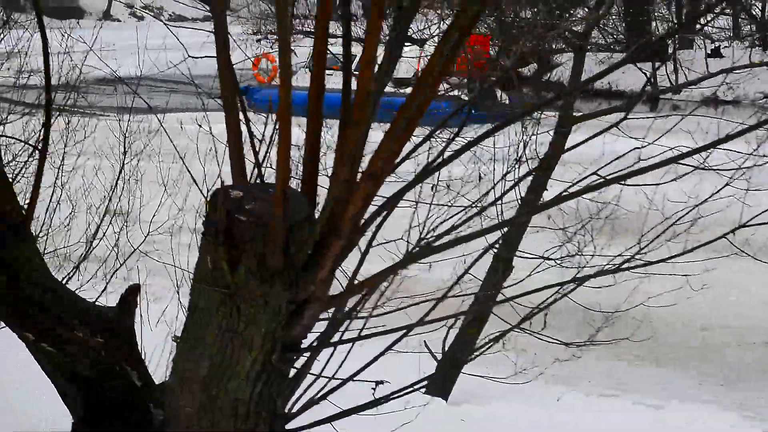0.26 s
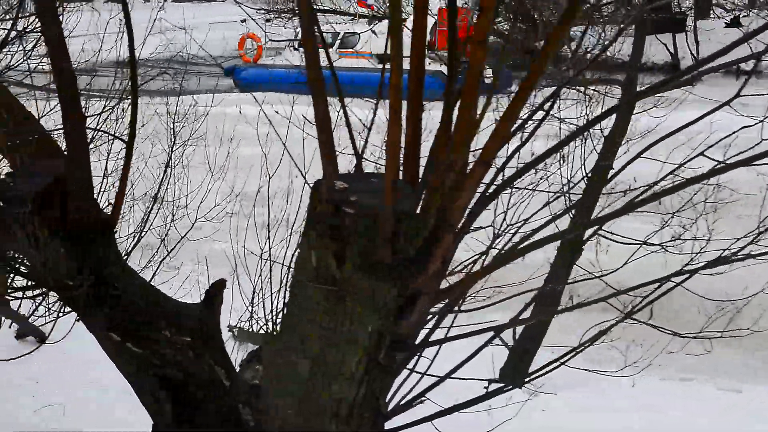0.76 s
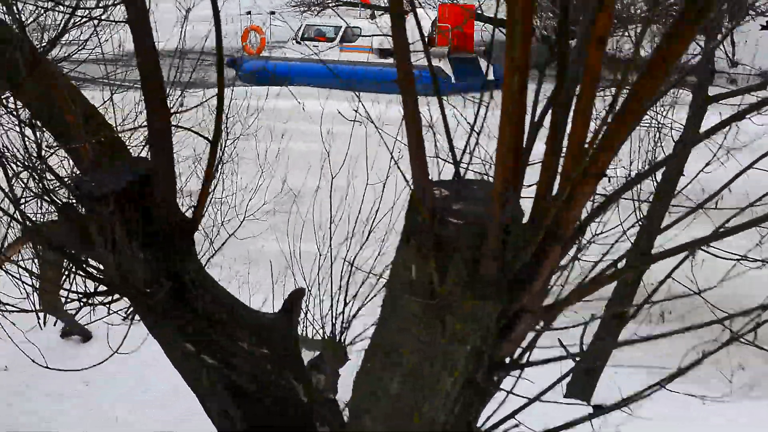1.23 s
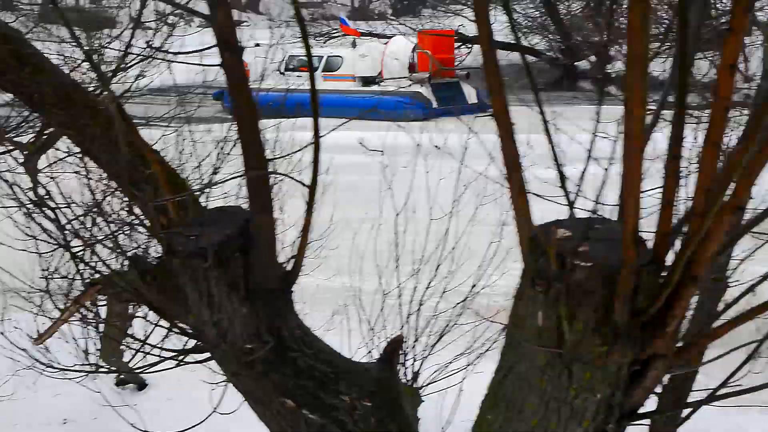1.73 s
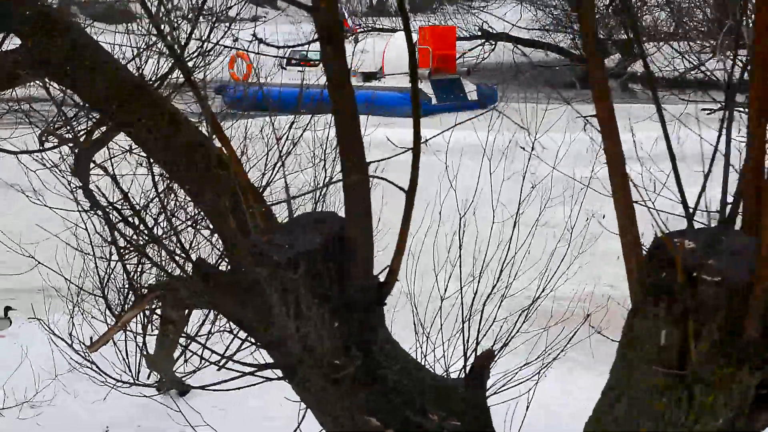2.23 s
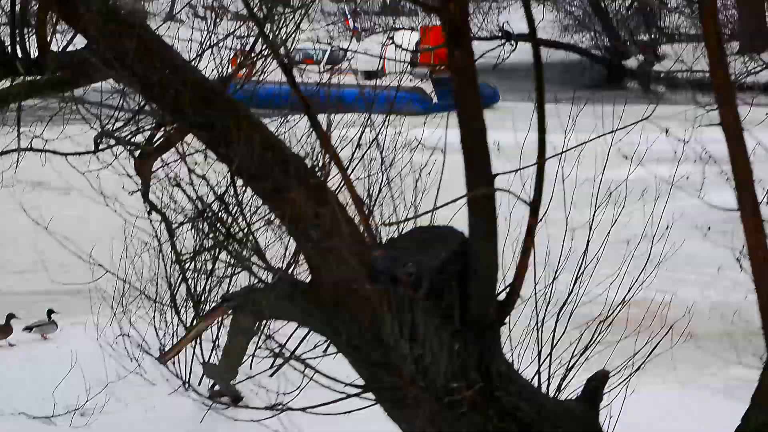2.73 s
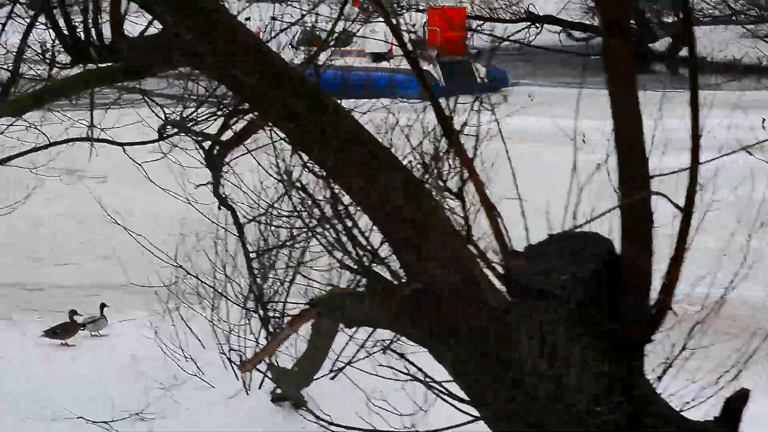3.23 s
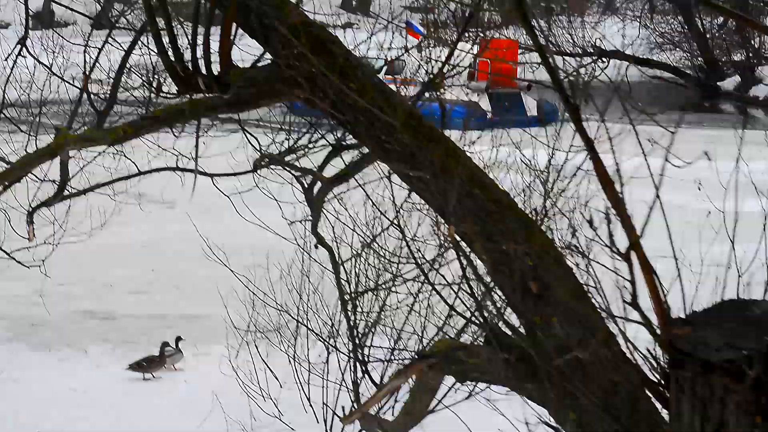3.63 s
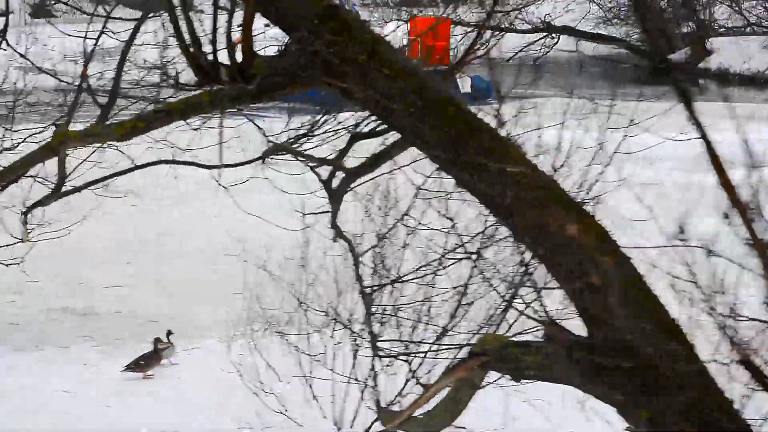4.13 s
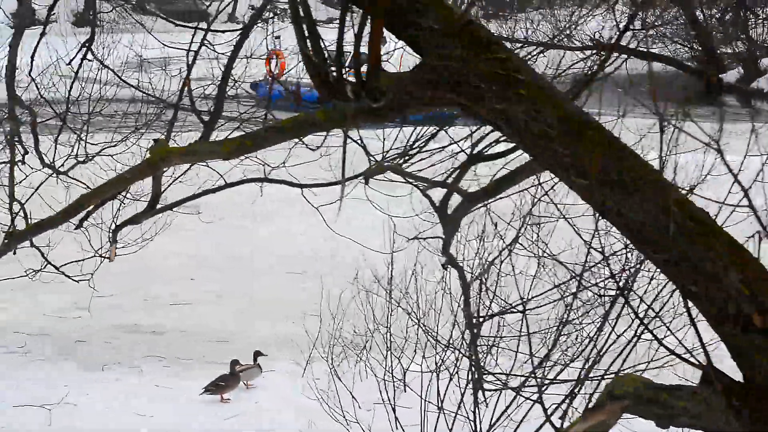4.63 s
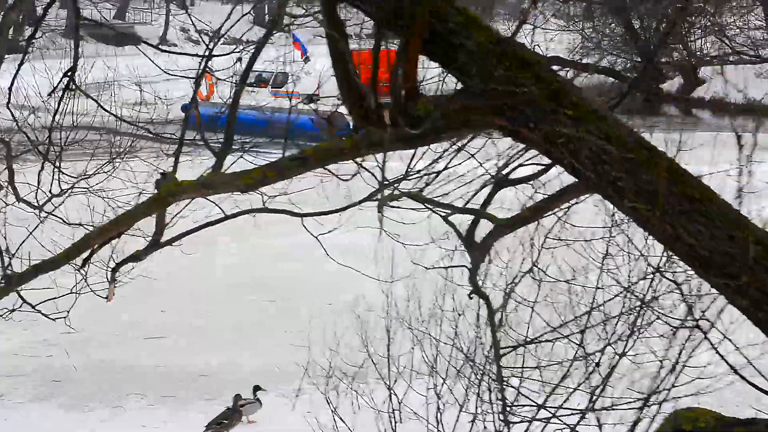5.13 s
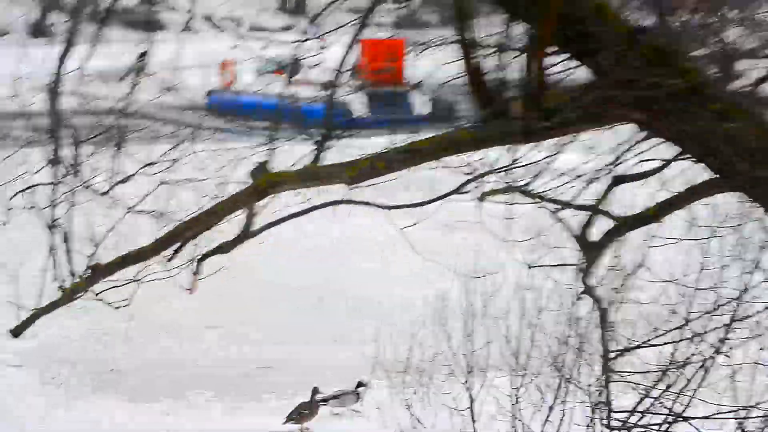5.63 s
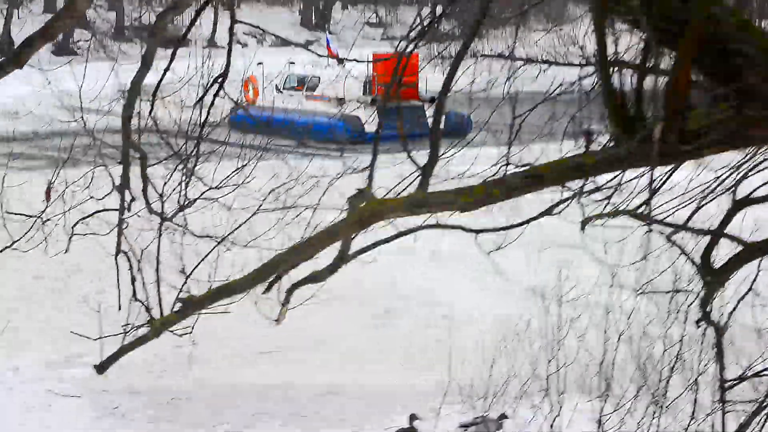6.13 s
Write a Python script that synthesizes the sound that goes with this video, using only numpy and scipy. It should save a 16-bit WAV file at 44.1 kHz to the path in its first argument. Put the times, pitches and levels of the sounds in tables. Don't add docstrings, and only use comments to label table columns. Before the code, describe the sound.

A hovercraft's engine and ducted fan drone across open ice, pitch sagging, climbing, then falling, with faint metallic pings and late dry ticks.

```python
import sys
import numpy as np
from scipy import signal
from scipy.fft import rfft, irfft, next_fast_len
from scipy.io import wavfile
from scipy.ndimage import uniform_filter1d, map_coordinates

SR = 44100
rng = np.random.default_rng(int(sys.argv[2]) if len(sys.argv) > 2 else 0)


def ratio(d):
    e = np.asarray(d, float) / 20
    return 10 ** e


def to_wav(sig):
    pcm = np.clip(np.atleast_2d(sig), -1, 1) * 32767
    pcm = np.round(pcm).astype(np.int16)
    wavfile.write(sys.argv[1], SR, pcm.T)


N = 280917
NOW = np.arange(N) / SR


def unit(x):
    return x / np.sqrt(np.mean(x ** 2) + 1e-20)


def along(points, hz):
    f, v = np.transpose(points)
    return np.interp(np.log(hz + 1), np.log(f + 1), v)


def wobble(rate):
    return map_coordinates(rng.standard_normal(400), [NOW * rate])


def filtered(x, response):
    m = next_fast_len(N + 8192)
    hz = np.fft.rfftfreq(m, 1 / SR)
    return irfft(rfft(x, m) * response(hz), m)[..., :N]


def noise(spectrum, patchy_db):
    z = signal.stft(rng.standard_normal((2, N)), nperseg=512)[2]
    field = uniform_filter1d(rng.standard_normal(z.shape[1:]), size=4, axis=0)
    field = uniform_filter1d(field, size=8, axis=1)
    pair = signal.istft(z * ratio(patchy_db * unit(field)), nperseg=512)[1][:, :N]
    return unit(filtered(pair, lambda hz: ratio(along(spectrum, hz))))


def blown(modes):
    def peaks(f):
        return sum(ratio(db) / (1 + ((f - hz) / width) ** 2) for hz, width, db in modes)
    return unit(filtered(rng.standard_normal((2, N)), peaks))


def tone(turns, db, flutter_db, jitter):
    phase = 2 * np.pi * (turns + rng.random()) + jitter * wobble(12)
    return np.sqrt(2) * ratio(db + flutter_db * wobble(11)) * np.sin(phase)


# time in seconds, shaft rate in Hz, throttle from 0 to 1,
# heading from 0 (side on) to 1 (stern turned this way).
ENGINE_RUN = [(0.0, 56.6, 0.18, 0), (0.16, 54.25, .2, 0.15), (0.48, 51.63, 0.26, 0.086),
              (0.85, 48.52, 0.12, 0.26), (1.3, 46.5, 0.18, 0.069), (1.76, 45.14, 0.61, 0.12),
              (1.95, 45.65, 0.75, 0.12), (2.4, 50.22, 0.98, 0.043), (2.72, 53.6, 0.94, 0.21),
              (3.15, 56.8, 0.68, 0.014), (3.6, 58.64, 0.87, 0.37), (4.0, 60.1, 0.61, 0.31),
              (4.55, 58.9, 0.96, 0.64), (4.96, 55.89, 0.91, 0.78), (5.5, 52.25, 0.96, 0.99),
              (5.92, 48.05, 0.22, 0.99), (6.37, 42.8, 0.19, 0.65)]


def engine():
    s, *columns = np.transpose(ENGINE_RUN)
    return [uniform_filter1d(np.interp(NOW, s, c), size=SR // 8, mode="nearest") for c in columns]


def level(law):
    shaft_hz, throttle, heading = engine()
    cruise_hz = 52
    base_db, per_hz, open_db, stern_db = law
    speed_db = per_hz * (shaft_hz - cruise_hz)
    return base_db + speed_db + open_db * np.clip(throttle, 0, 1) + stern_db * np.clip(heading, 0, 1)


def lobes(rows, turns):
    swell_db, swell_rate = 2, 1.6
    total = 0
    for multiple, *law in rows:
        db = level(law) - swell_db * np.abs(wobble(swell_rate))
        total = total + tone(multiple * turns, db, flutter_db=1.5, jitter=.08 + .012 * multiple)
    return total


# multiple of the shaft rate, level in dB with throttle shut,
# slope in dB per Hz of shaft, change in dB at full throttle, change in dB stern on.
LOW_ORDERS = [(1, -57, 1.6, 14, -15.5), (2, -41.5, -0.33, 5, 10), (3, -37, 0.25, 12.5, -0.5),
              (4, -35, 0.63, 7, -5.5)]
# frequency in Hz, gain in dB.
EXHAUST_PIPE = [(40, 1.2), (90, 2.6), (100, 2), (115, -3.5), (140, -0.1), (160, -3.1), (183, -2), (215, 5),
                (245, -3), (800, .1)]
UPPER_ORDERS = [(3.5, -55, 0.4, 8.5, -10), (5, -44, -.3, 1.5, 7.5), (6, -47, -0.6, 0.5, 1.5),
                (7, -42.5, 0.73, -4.4, 4.5), (8, -47.5, 0.3, -0.3, 4), (9, -57.5, 0.8, -4.5, 2.5),
                (10, -45.5, 0.4, -7.5, -3), (11, -54, 0, -1.5, 1.5), (12, -56.5, 0.7, 2.5, 3.5),
                (14, -54, 0.3, 1, -4.5)]


def shaft_orders(shaft_hz, turns):
    total = lobes(UPPER_ORDERS, turns)
    for order, *law in LOW_ORDERS:
        db = level(law) + along(EXHAUST_PIPE, order * shaft_hz) + .8 * wobble(3)
        total = total + tone(order * turns, db, flutter_db=.5, jitter=.05)
    return total


# multiple of the blade rate, level in dB with throttle shut,
# slope in dB per Hz of shaft, change in dB at full throttle, change in dB stern on.
BLADE_TONES = [(1, -45, -0.029, 7.5, 5), (2, -35, 0.22, -3.1, .1), (3, -47.5, -.6, -2.5, 2.1),
               (4, -50.5, 0.53, -5, 7), (5, -59.5, .3, 7, 4), (6, -54, 0.13, -8, 1)]


def fan(turns):
    return lobes(BLADE_TONES, 2.594 * turns)


# frequency in Hz, density in dB per Hz.
RUMBLE_SPECTRUM = [(15, -34.5), (40, -22), (90, -0.5), (150, -4), (210, 1), (290, -5.5), (370, -3.5),
                   (470, -19), (700, -27.5), (1000, -120)]
# dB with throttle shut, dB per Hz of shaft, dB at full throttle, dB stern on.
RUMBLE_LEVEL = (-33.5, 0.4551, -1.1, 4)


def rumble():
    return ratio(level(RUMBLE_LEVEL) + 0.37 * wobble(20)) * noise(RUMBLE_SPECTRUM, patchy_db=0.0)


def uneven_firing(shaft_hz, turns):
    total, rumble_db = 0, level(RUMBLE_LEVEL)
    for third in range(2, 26):
        if third % 3 == 0:
            continue
        colour_db = along(RUMBLE_SPECTRUM, third / 3 * shaft_hz)
        db = rumble_db - 19 + colour_db + 2 * wobble(1.233)
        total = total + tone(third / 3 * turns, db, flutter_db=3, jitter=.3)
    return total


# frequency in Hz, density in dB per Hz.
RUSH_SPECTRUM = [(250, -120), (400, -2.5), (600, -1), (900, -7.5), (1150, -10), (1400, -9.5), (1750, -13),
                 (2000, -19.5), (2500, -21.5), (3500, -32), (4500, -31), (5500, -30.5), (7000, -43.5),
                 (12000, -61.5)]
# dB with throttle shut, dB per Hz of shaft, dB at full throttle, dB stern on.
RUSH_LEVEL = (-38, 0.32, -0.82, 0.9)


def air_rush(turns):
    throb = 1 + 0.084 * np.sin(2 * np.pi * turns)
    return ratio(level(RUSH_LEVEL) + 0.42 * wobble(20)) * throb * noise(RUSH_SPECTRUM, patchy_db=0.5)


# frequency in Hz, width in Hz, level in dB.
LOW_DUCT_MODES = [(990, 81, -12), (1140, 92, -8)]
HIGH_DUCT_MODES = [(4020, 340, 7), (4470, 200, -3), (5100, 320, 1)]
# dB with throttle shut, dB per Hz of shaft, dB at full throttle, dB stern on.
LOW_WHISTLE_LEVEL = (-56, 0.83, 4, -0.5)
HIGH_WHISTLE_LEVEL = (-61, 0, 10, -9)


def duct_whistles():
    axis_s, half_s, axis_db = 4.1, 0.25, 3.5
    facing = np.exp(-((NOW - axis_s) / half_s) ** 2)
    low_db = level(LOW_WHISTLE_LEVEL) + axis_db * facing + 1.5 + 0.95 * wobble(8.2)
    high_db = level(HIGH_WHISTLE_LEVEL) - 6 + 1.7 * wobble(30)
    return ratio(low_db) * blown(LOW_DUCT_MODES) + ratio(high_db) * blown(HIGH_DUCT_MODES)


def hovercraft():
    shaft_hz = engine()[0]
    turns = np.cumsum(shaft_hz) / SR
    tones = shaft_orders(shaft_hz, turns) + fan(turns) + uneven_firing(shaft_hz, turns)
    air = rumble() + air_rush(turns) + duct_whistles()
    return air + [[1], [0]] * tones


# frequency in Hz, density in dB per Hz.
HISS_SPECTRUM = [(100, -120), (500, -19), (1500, -1.5), (2200, -3), (3500, -6.5), (5500, -13.5),
                 (7000, -15.5), (10000, -21), (15500, -29.5)]


def hiss():
    return ratio(-49.5) * noise(HISS_SPECTRUM, patchy_db=-0.06)


# start in seconds, peak level in dB, pitch in Hz.
PANEL_PINGS = [(0.059, -32, 1440), (0.152, -32, 1480), (0.2399, -32, 1470), (0.2937, -35.5, 1575),
               (0.437, -36, 1480), (0.506, -29.5, 1480), (0.528, -31, 1480), (0.6555, -35, 1480),
               (1.1824, -37, 1480), (1.3184, -35, 1490), (1.546, -32, 1480), (1.6601, -30.5, 1480),
               (1.9475, -40, 1510), (2.29, -29, 1480), (2.3718, -33.5, 1480), (2.4776, -29, 1436),
               (2.529, -31, 1480), (2.5735, -43, 1430), (2.9864, -30.5, 1607), (4.1616, -33, 1480),
               (5.8437, -59, 1480), (6.2479, -41.5, 1480)]
# frequency in Hz, width in Hz, level in dB.
PANEL_MODE = [(1480, 70, 0)]
# dB with throttle shut, dB per Hz of shaft, dB at full throttle, dB stern on.
BUZZ_LEVEL = (-59.5, 0.87, -0.5, 5)


def panel():
    pings, t = np.zeros(N + SR), np.arange(SR // 16) / SR
    swell = t / 0.0048 * np.exp(1 - t / 0.0049)
    around = 0
    for s, db, hz in PANEL_PINGS:
        pings[round(s * SR):][:len(t)] += ratio(db - 4) * swell * np.sin(2 * np.pi * hz * t)
        around = around + ratio(db - 33) * np.exp(-((NOW - s) / 0.19) ** 2)
    fits = unit(ratio(2.1 * wobble(45)) * blown(PANEL_MODE))
    return [[1], [.5]] * pings[:N] + (ratio(level(BUZZ_LEVEL)) + around) * fits


# frequency in Hz, left minus right in dB.
PORT_TILT = [(60, 0), (200, 0.75), (380, -1), (700, -3), (1100, -7), (1450, -2), (1700, -4.5), (2400, 0.5),
             (3500, 5), (4500, -11), (5600, 4)]
# frequency in Hz, lead of the left in radians.
PORT_LEAD = [(20, 0), (100, -.06), (200, -.18), (300, -.32), (420, -.38), (860, -.38), (1210, .4),
             (2240, .8), (3010, .1), (4570, 1.2), (6000, 0)]
# frequency in Hz, likeness from 0 to 1.
PORT_LIKENESS = [(60, 1), (150, .998), (300, .985), (640, .92), (1400, .8), (3100, .4), (4500, .7),
                 (7000, .1)]


def ports(pair):
    def turn(hz):
        return np.arccos(np.clip(along(PORT_LIKENESS, hz), -1, 1)) / 2

    def half(hz):
        return ratio(along(PORT_TILT, hz) / 2) * np.exp(.5j * along(PORT_LEAD, hz))

    mid, side = filtered(pair, lambda hz: [np.cos(turn(hz)), np.sin(turn(hz))])
    return filtered(np.array([mid + side, mid - side]), lambda hz: [half(hz), 1 / half(hz)])


# start in seconds, left ring in dB, right ring in dB, low knock in dB,
# pitch factor of the right ring.
HOUSING_TICKS = [(3.8196, -46, -29, -50, 1.03), (4.1757, -46, -30, -50, 1.0), (4.1802, -18, -19, -25, 1.13),
                 (4.63, -40, -42, -50, 1.01), (4.7800, -34, -38, -46, 1.04), (4.7814, -40, -29, -46, 1.04),
                 (4.8933, -27, -14, -30, .99), (4.8939, -21, -24, -34, 1.01), (5.009, -38, -22, -44, 1.06),
                 (5.0115, -46, -30, -46, 1.01), (5.5297, -30, -21, -42, .99), (5.7252, -38, -44, -46, 1.01),
                 (5.7269, -14, -12, -36, 1.05), (5.7755, -20, -15, -21, 1.27), (5.776, -19, -17, -20, .9),
                 (5.7778, -44, -30, -25, 1.1)]
# frequency in Hz, level in dB, t60 in seconds.
LEFT_MODES = [(6630, 4.5, 0.0018), (4940, -2, 0.0027)]
RIGHT_MODES = [(4460, 0.5, 0.0052), (5870, -8.5, 0.0027), (3660, -5, 0.0017)]
SHELL_MODES = [(1470, -9.5, 0.042), (1910, 1, 0.0039), (2720, -18, 0.0065)]


def housing():
    out, t = np.zeros((2, N + SR)), np.arange(SR // 20) / SR
    onset = 1 - np.exp(-(t / .00012) ** 2)

    def ring(modes, pitch):
        total = 0
        for k, (hz, db, t60) in enumerate(modes):
            sense = 1 if k == 0 else -1
            total = total + sense * ratio(db - 60 * t / t60) * np.sin(2 * np.pi * hz * pitch * t)
        return onset * total

    for s, left_db, right_db, knock_db, pitch in HOUSING_TICKS:
        grit = signal.lfilter(*signal.butter(2, 12500, fs=SR), rng.standard_normal((2, len(t))))
        crack = ratio(left_db - 7 - 60 * t / 0.0014) * grit * [[1], [.4]]
        left = ratio(left_db) * ring(LEFT_MODES, 1)
        right = ratio(right_db) * ring(RIGHT_MODES, pitch)
        knock = ratio(knock_db) * ring(SHELL_MODES, 0.913)
        out[:, round(s * SR):][:, :len(t)] += np.array([left, right]) + knock + crack
    return out[:, :N]


def scene():
    return ports(hovercraft() + panel()) + hiss() + housing()


def roll_off(x):
    return signal.sosfilt(signal.butter(12, 16110, fs=SR, output="sos"), x)


def record(dry):
    mix = filtered(dry, lambda hz: hz < 15750)
    return roll_off(mix)


dry = scene()
out = record(dry)
to_wav(out)
```